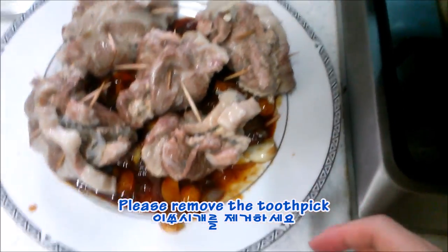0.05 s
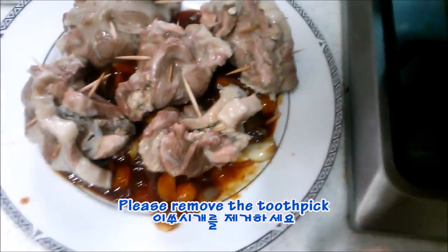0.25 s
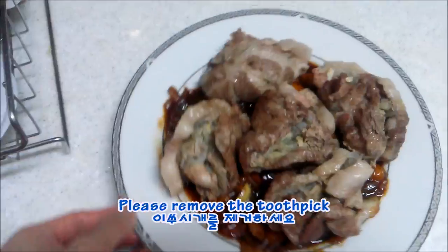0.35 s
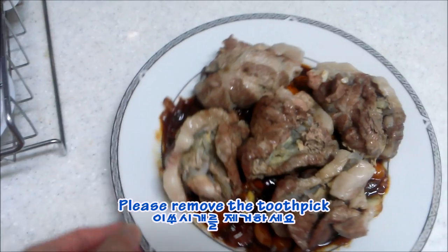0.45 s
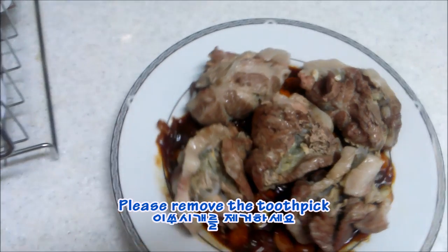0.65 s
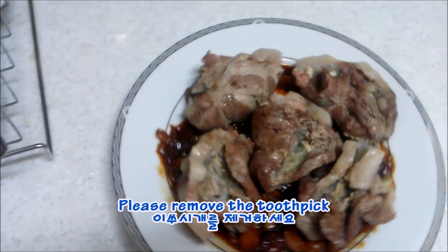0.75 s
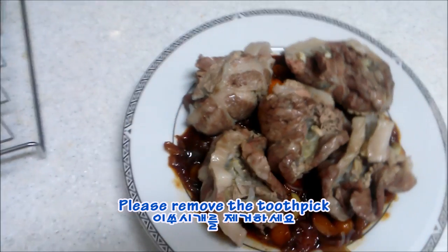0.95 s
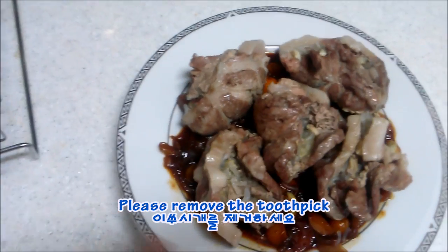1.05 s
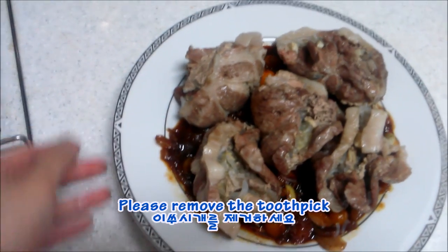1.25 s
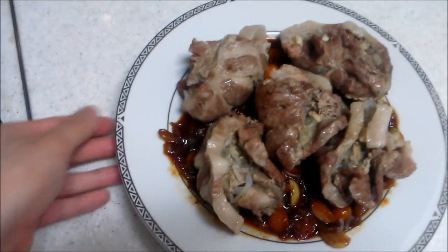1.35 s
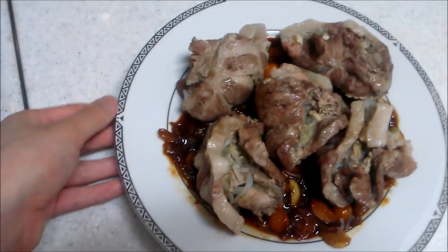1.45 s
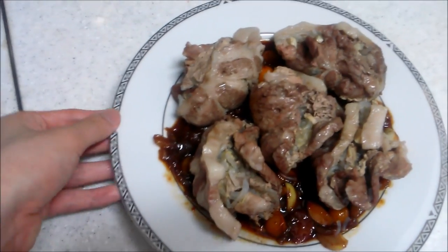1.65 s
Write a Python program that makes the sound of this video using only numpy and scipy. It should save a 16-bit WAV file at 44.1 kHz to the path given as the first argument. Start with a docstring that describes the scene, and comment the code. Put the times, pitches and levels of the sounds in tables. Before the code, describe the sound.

Gritty ceramic plate scrape with dull knocks on a counter, followed by a brief clatter of steel tongs

```python
"""A loaded ceramic plate is nudged and slid over a kitchen counter: gritty friction noise with
plate-mode peaks, narrow rasps, and dull knocks that start the modes of the counter.
Steel tongs clatter down and bounce, then tap the plate rim: decaying modes plus a noisy crack. A rustle
of the settling plate swells under the clatter and lingers after the taps. Dry ticks and a soft push on
a small camera come first; behind lie a low rumble of hands, a short kitchen tail on the hits, and hiss."""
import sys
import numpy as np
from scipy import signal
from scipy.fft import rfft, irfft
from scipy.io import wavfile

SR = 44100
rng = np.random.default_rng(int(sys.argv[2]) if len(sys.argv) > 2 else 0)


def wav_out(sig):
    """Save sig, one row per channel (or a flat mono array), as 16-bit PCM at SR to the path in sys.argv[1]."""
    wavfile.write(sys.argv[1], SR, np.round(np.clip(np.atleast_2d(sig).T, -1, 1) * 32767).astype(np.int16))


def level_to_linear(level):
    """Convert decibel levels to linear amplitude factors, elementwise."""
    exponent = np.asarray(level, float) / 20
    return 10 ** exponent


N = 74970
T = np.arange(N) / SR  # s


def unit(x):
    """Scale to rms 1."""
    return x / np.sqrt(np.mean(x ** 2))


def colour(x, table):
    """Shape the spectrum by a (f/Hz, level/dB) table over log frequency, then scale to rms 1."""
    f = np.fft.rfftfreq(N, 1 / SR) + 1
    table = np.array(table)
    level_db = np.interp(np.log(f), np.log(table[:, 0]), table[:, 1])
    return unit(irfft(rfft(x) * level_to_linear(level_db), N))


def curve(rows):
    """Gain envelope drawn through (t/s, level/dB) rows, silent outside."""
    r = np.array(rows)
    return level_to_linear(np.interp(T, r[:, 0], r[:, 1], -150, -150))


def fall(t0, t60, rise):
    """Envelope that rises fast at t0 and decays exponentially (all in s)."""
    d = np.maximum(T - t0, 0)
    return (1 - np.exp(-d / rise)) * np.exp(-np.log(1000) * d / t60)


def band_pass(x, order, low_hz, high_hz):
    """Butterworth band-pass."""
    return signal.sosfilt(signal.butter(order, [low_hz, high_hz], "band", fs=SR, output="sos"), x)


GRIT_PER_S, GRIT_SPREAD_DB, SMOOTH_DB = 1500, 2.5, 2.5  # mean grain rate, size spread, smooth over grit
PATCHY_DB, PATCH_PER_S, TREBLE_HZ = 2.5, 30, 6000  # flicker depth and rate; where extra treble is met
RUB_WIDTH_HZ = 130  # from the centre of a mode to half its dB


def rub(rows, table, modes=()):
    """Grit of uneven size over smooth friction noise; each third-octave band flickers on its own."""
    hit = rng.random(N) < GRIT_PER_S / SR
    size = np.minimum(rng.exponential(1, N), 4)
    grit = unit(hit * np.sign(rng.standard_normal(N)) * level_to_linear(GRIT_SPREAD_DB * size))
    friction = colour(grit + level_to_linear(SMOOTH_DB) * rng.standard_normal(N), table)
    f = np.fft.rfftfreq(N, 1 / SR) + 1
    peaks_db = sum(db / (1 + ((f - hz) / RUB_WIDTH_HZ) ** 4) for hz, db in modes)
    spec = rfft(unit(irfft(rfft(friction) * level_to_linear(peaks_db), N)))
    r, out = np.array(rows), 0
    for step in range(22):
        hz = 125 * 2 ** (step / 3)
        # triangular bands that cross-fade into their neighbours
        band = irfft(spec * np.maximum(1 - 3 * abs(np.log2(f / hz)), 0), N)
        flicker_db = PATCHY_DB * np.interp(T * PATCH_PER_S, np.arange(200), rng.standard_normal(200))
        tilt_db = np.interp(T, r[:, 0], r[:, 2]) * hz / TREBLE_HZ
        out = out + band * level_to_linear(flicker_db + tilt_db)
    return curve(rows) * out


# foot of the plate rubbing the counter: t/s, level/dB, extra treble/dB
SLIDE_MOTION = [(.24, -50, -14), (.275, -54, 10), (.281, -29.5, 3), (.311, -31, -7), (.325, -30, 1),
                (.353, -34, 3.5), (.387, -44.5, 0.5), (.549, -52.5, 3.5), (.561, -44.5, -2.5),
                (.593, -51.5, 2), (.615, -48, 4), (.651, -50, -3), (.93, -50, -0.5), (.975, -47.5, -7.5),
                (1.01, -55.5, -4.5), (1.05, -84.5, 17)]
# colour of that friction: f/Hz, level/dB
SLIDE_SPECTRUM = [(180, -12.5), (300, -11), (900, -7.5), (1900, -1.5), (2600, -6.5), (3300, -5.5),
                  (7320, -9), (10000, -19.5), (16000, -33.5)]
# modes of the plate that the rubbing keeps alive: f/Hz, level/dB over the colour
RUBBED_PLATE_MODES = [(985, 2.5), (1510, 4.6), (3710, 4.1), (4900, 4.8), (5820, 2.5), (7130, 4.3),
                      (8670, 6.1)]


def slide():
    """The foot of the plate rubs the counter and its modes stand out as peaks in the noise."""
    return rub(SLIDE_MOTION, SLIDE_SPECTRUM, RUBBED_PLATE_MODES)


# small scrapes where grit catches: t/s, level/dB, centre f/Hz
GRIT_SCRAPES = [(0.515, -46.5, 6000), (0.557, -44.5, 9000), (.560, -44, 6500), (0.61, -43.5, 8030),
                (0.612, -45, 3230), (.728, -59.5, 10100), (.944, -46, 3040), (0.973, -50.5, 8400),
                (0.99, -49.5, 6640)]
SCRAPE_T60_S, SCRAPE_WIDTH = 0.1, 0.047  # width: each side, as a share of the centre


def scrapes():
    """Short narrow rasps: band-passed noise under a fast decay."""
    out = np.zeros(N)
    for t, db, hz in GRIT_SCRAPES:
        rasp = band_pass(rng.standard_normal(N), 1, hz * (1 - SCRAPE_WIDTH), hz * (1 + SCRAPE_WIDTH))
        out += level_to_linear(db) * fall(t, SCRAPE_T60_S, 0.00058) * unit(rasp)
    return out


# pushes of the plate on the counter: t/s, level/dB, noise decay t60/s, top f/Hz
COUNTER_KNOCKS = [(0.2765, -27.5, 0.23, 2980), (0.322, -30, 0.18, 3000), (0.365, -41.5, 0.42, 1550),
                  (1.067, -64, 0.1, 3000), (1.148, -54.5, 0.52, 199), (1.202, -48.5, 0.63, 600),
                  (1.247, -40, 0.2, 1550), (1.264, -39, 0.19, 495), (1.4, -49.5, 0.2, 1500)]
# colour of the counter's rattle: f/Hz, level/dB
COUNTER_SPECTRUM = [(30, -2), (100, -15.5), (330, -6), (800, -12), (1500, -24), (3500, -33)]
# modes of the counter: f/Hz, level/dB
COUNTER_RING_MODES = [(101, 5), (122, 4), (188, 0.5), (230, 0.5), (318, 3), (470, -4), (553, -5),
                      (735, 3.5), (878, 0), (996, -5.5), (1184, -5)]
KNOCK_RISE_S, COUNTER_RING_DB, RING_LONGER = 0.0017, -6, 1.316  # the last: ring t60 over noise t60


def counter():
    """Each knock is a rattling push that shakes the counter and starts its modes; soft contact is dull."""
    phase = 2 * np.pi * rng.random((len(COUNTER_KNOCKS), 16))
    noise, out = colour(rng.standard_normal(N), COUNTER_SPECTRUM), 0
    for (t, db, t60, top_hz), p in zip(COUNTER_KNOCKS, phase):
        bell = sum(level_to_linear(mode_db) * np.sin(2 * np.pi * hz * T + p[k])
                   for k, (hz, mode_db) in enumerate(COUNTER_RING_MODES))
        rattle = noise * fall(t, t60, KNOCK_RISE_S)
        ringing = level_to_linear(COUNTER_RING_DB) * bell * fall(t, t60 * RING_LONGER, KNOCK_RISE_S)
        out = out + level_to_linear(db) * signal.lfilter(*signal.butter(2, top_hz, fs=SR), rattle + ringing)
    return out


SCATTER_DB, CONTACT_S = 2.5, 0.001  # spread of mode weights from hit to hit, mode rise time
# loose contact makes every mode waver, more as the chatter goes on
ROUGH_RAD, ROUGH_PER_S, ROUGH_GROWS_S = 0.4, 250, 0.015


def strike(hits, modes, crack_db, crack_t60, crack_rise):
    """Every hit starts the same wavering modes with fresh weights and phases and adds a noisy crack."""
    scatter = rng.standard_normal((len(hits), 32))
    phase = 2 * np.pi * rng.random((len(hits), 32))
    noise = unit(band_pass(rng.standard_normal(N), 4, 1000, 7500))
    growth = np.clip((T - hits[0][0]) / ROUGH_GROWS_S, 0.5, 4)
    out = np.zeros(N)
    for k, (hz, db, t60) in enumerate(modes):
        wobble = np.interp(T * ROUGH_PER_S, np.arange(500), rng.standard_normal(500))
        waver = ROUGH_RAD * growth * wobble
        for (t, hit_db, treble), s, p in zip(hits, scatter, phase):
            # the share of treble counts once at 3 kHz and more strongly above
            gain = level_to_linear(hit_db + db + SCATTER_DB * s[k]) * treble ** (hz / 3000)
            out += gain * fall(t, t60, CONTACT_S) * np.sin(2 * np.pi * hz * T + p[k] + waver)
    cracks = sum(level_to_linear(db + crack_db) * treble * fall(t, crack_t60, crack_rise) for t, db, treble in hits)
    return out + noise * cracks


# tongs landing and bouncing: t/s, level/dB, share of treble [ratio]
TONGS_BOUNCES = [(1.1921, -32.5, 1.), (1.2135, -33, 0.79), (1.232, -34.5, 0.83), (1.2475, -33.5, 0.44),
                 (1.259, -53, 0.17)]
# modes of the steel tongs: f/Hz, level/dB, t60/s
TONGS_MODES = [(599, -4, 0.11), (837, -2.5, 0.099), (1175, -4.5, 0.29), (1279, 3.5, 0.1), (1388, 2, 0.11),
               (2213, -5.5, 0.13), (2410, -0.5, 0.13), (2880, -1, 0.098), (3124, 5.5, 0.33),
               (3190, 7.5, 0.077), (3495, 7, 0.084), (3895, 2, 0.09), (4390, -2.5, 0.1), (4500, 0, 0.22),
               (5020, 0.5, 0.12), (5490, 2.5, 0.14), (5900, -3.5, 0.16), (6280, -14, 0.1),
               (6630, 1.5, 0.094), (7140, 1, 0.098), (7780, -2, 0.11), (14800, -9, 0.054)]


def tongs():
    """Steel tongs bounce: long bright modes under a clatter of noise."""
    return strike(TONGS_BOUNCES, TONGS_MODES, crack_db=8, crack_t60=0.095, crack_rise=0.0086)


# taps on the plate rim: t/s, level/dB, share of treble [ratio]
PLATE_TAPS = [(1.3926, -34.5, 0.92), (1.4005, -25.5, 0.22), (1.5029, -56.5, 1)]
# modes of the loaded plate: f/Hz, level/dB, t60/s
PLATE_MODES = [(1150, -1, 0.046), (1367, 2.5, 0.026), (1790, -13, 0.12), (3140, 5, 0.027),
               (2696, 8.5, 0.06), (4120, 5, 0.027), (5060, 11.5, 0.02), (5879, 9.5, 0.021),
               (6800, 10, 0.02)]


def plate_taps():
    """The tongs tap the rim: mostly short-lived ceramic modes and a sharp crack."""
    return strike(PLATE_TAPS, PLATE_MODES, crack_db=2.8, crack_t60=0.052, crack_rise=0.00031)


# rustle as the plate settles: t/s, level/dB, extra treble/dB
SETTLING = [(1.16, -73, 3), (1.19, -62, 6.5), (1.238, -41.5, -1), (1.366, -49, 1), (1.46, -53.5, 3.5),
            (1.54, -52, -1.5), (1.7, -59, 5.5)]
# colour of the rustle: f/Hz, level/dB
SETTLING_SPECTRUM = [(180, -38), (700, -13), (1100, -6), (2650, -1.5), (4500, -2.5), (6620, 0.5),
                     (10000, -9), (16000, -26)]


def rustle():
    """The plate settles with the same gritty friction, without mode peaks."""
    return rub(SETTLING, SETTLING_SPECTRUM)


def ring(x, hz, t60):
    """One decaying mode driven by x: a complex one-pole resonator."""
    pole = np.exp(2j * np.pi * hz / SR - np.log(1000) / (t60 * SR))
    return signal.lfilter([1], [1, -pole], x).imag


# dry ticks: t/s, level/dB, ring f/Hz
DRY_TICKS = [(0.2463, -22.5, 4100), (0.261, -42, 3900), (0.2662, -16, 4460)]
TICK_T60_S, TICK_EDGE_DB = 0.001, 6.5


def ticks():
    """A sample and its inverse make each snap and drive two very short rings."""
    out = np.zeros(N)
    for t, db, hz in DRY_TICKS:
        kick = np.zeros(N)
        start = int(t * SR)
        kick[start:start + 2] = level_to_linear(db) * np.array([1, -1])
        out += level_to_linear(TICK_EDGE_DB) * kick
        out += 4.05 * ring(kick, hz, TICK_T60_S) + 1.33 * ring(kick, 1.59 * hz, TICK_T60_S)
    return out


PUSH_S, PUSH_DB, PUSH_T60_S = 0.2255, -13.5, 0.1  # onset, depth before the bass limit, decay
PUSH_HZ = 16  # bass limit of the microphone


def push():
    """A soft push on the camera body: a slow negative pulse through the microphone's bass limit."""
    pulse = fall(PUSH_S, PUSH_T60_S, 0.011)
    return -level_to_linear(PUSH_DB) * signal.lfilter(*signal.butter(1, PUSH_HZ, "high", fs=SR), pulse)


# low rumble of hands on the counter: t/s, level/dB
HAND_RUMBLE = [(0, -63), (.225, -50.5), (.275, -40.5), (.33, -33), (.382, -40), (.47, -48), (.72, -60),
               (1.09, -65), (1.275, -51.5), (1.41, -58.5), (1.46, -57.5), (1.7, -61)]


def rumble():
    """Hands on the counter: noise between 15 and 72 Hz that swells and fades."""
    return unit(band_pass(rng.standard_normal(N), 2, 15, 72)) * curve(HAND_RUMBLE)


ROOM_T60_S, ROOM_DB, ROOM_HZ = 0.28, -19, 6000  # decay, tail level, low-pass corner


def room(x):
    """Small hard kitchen: a decaying, slightly dull noise tail."""
    t = T[:SR // 2]
    tail = rng.standard_normal(len(t)) * np.exp(-np.log(1000) * t / ROOM_T60_S) * (t > 0.004)
    tail = signal.sosfilt(signal.butter(1, ROOM_HZ, fs=SR, output="sos"), tail)
    return x + level_to_linear(ROOM_DB) * signal.fftconvolve(x, tail / np.sqrt(np.sum(tail ** 2)))[:N]


# colour of the dull opening hiss: f/Hz, level/dB
EARLY_HISS = [(35, -32), (60, -14.5), (98, -10), (315, -16.5), (363, -3), (398, -23), (1090, -19.5),
              (3040, -28), (16000, -48.5)]
# colour of the later kitchen and camera hiss: f/Hz, level/dB
LATE_HISS = [(20, -27), (120, -13), (400, -6), (600, -19), (1160, -11.5), (3000, -16), (7670, -15.5),
             (16000, -36)]
FLOOR_DB, FLOOR_LATE_DB, CHANGE_S = -63.5, -66.5, 0.23


def floor():
    """Kitchen and camera noise, dull at first, then at once brighter and a little quieter."""
    early = level_to_linear(FLOOR_DB) * colour(rng.standard_normal(N), EARLY_HISS)
    late = level_to_linear(FLOOR_LATE_DB) * colour(rng.standard_normal(N), LATE_HISS)
    return np.where(T < CHANGE_S, early, late)


def scene():
    """Hits ring in the room; friction, ticks, floor, rumble and push stay dry."""
    hits = room(tongs() + plate_taps() + counter())
    friction = slide() + scrapes() + rustle()
    return (hits + friction + ticks() + floor() + rumble() + push())[None]


def roll_off(x):
    """The treble ends steeply here."""
    return signal.sosfilt(signal.butter(12, 16840, fs=SR, output="sos"), x)


TOP_HZ = 15750


def record(dry):
    """Steep elliptic low-pass at TOP_HZ: almost nothing is heard above 15.75 kHz."""
    trimmed = signal.sosfilt(signal.ellip(6, 0.3, 22, TOP_HZ, fs=SR, output="sos"), dry)
    return roll_off(trimmed)


dry = scene()
out = record(dry)
wav_out(out)
```